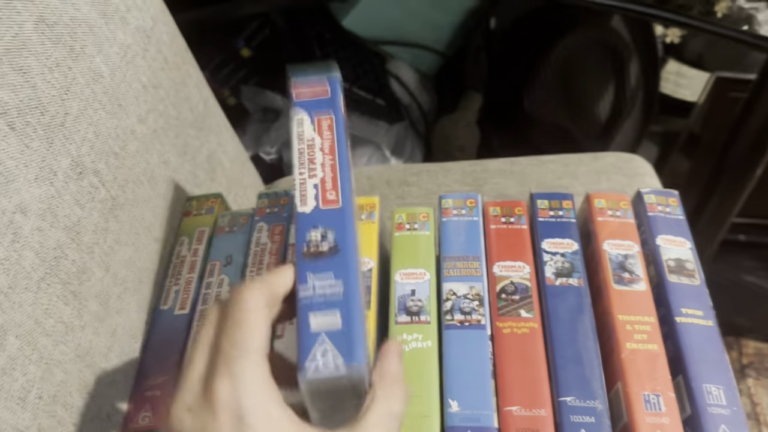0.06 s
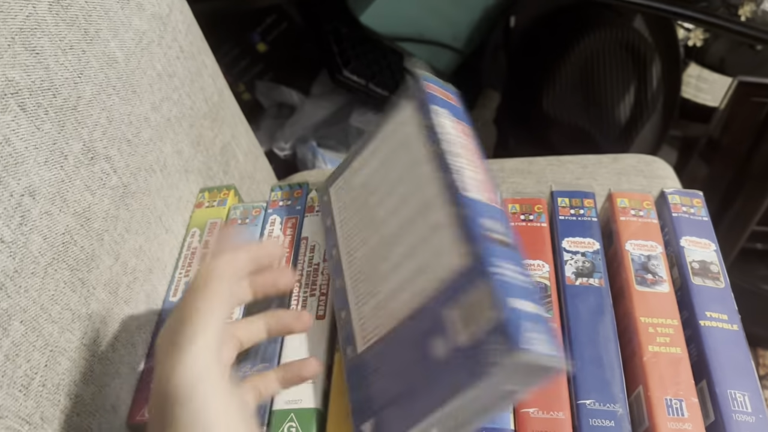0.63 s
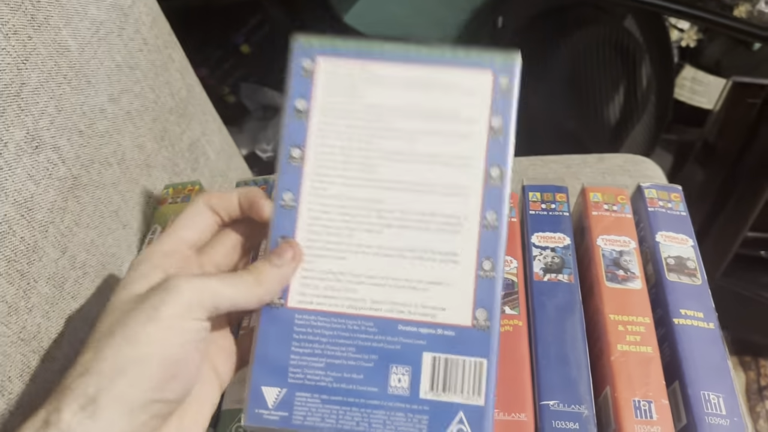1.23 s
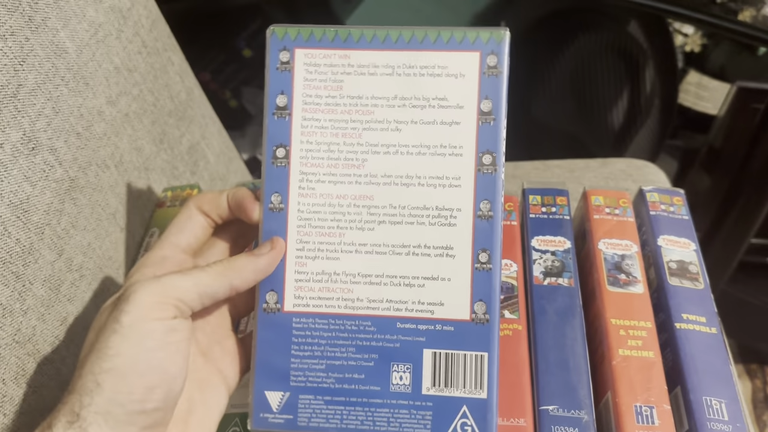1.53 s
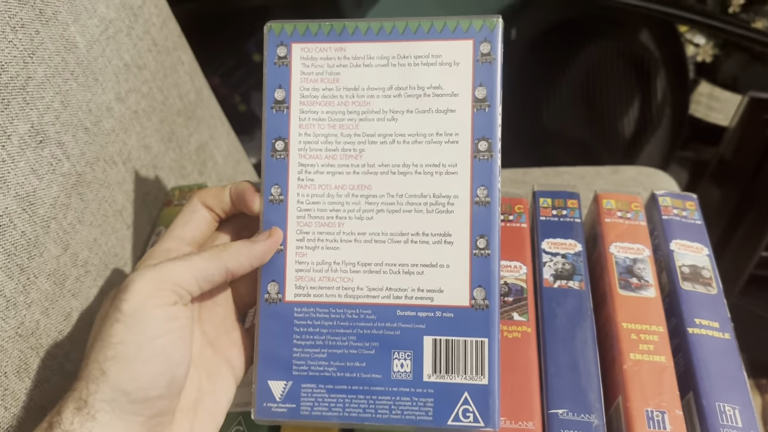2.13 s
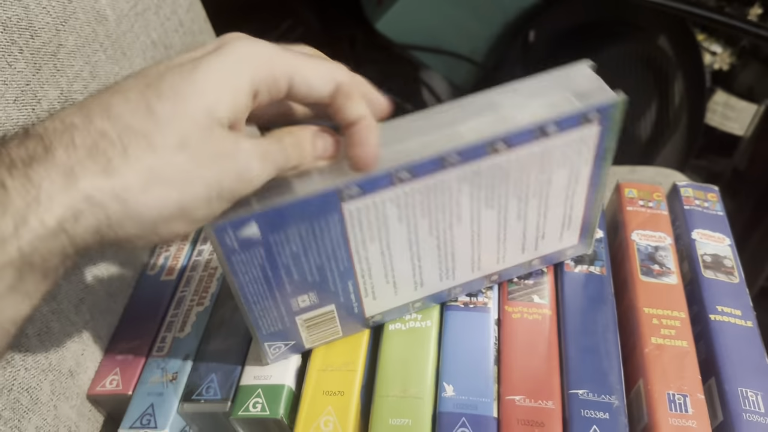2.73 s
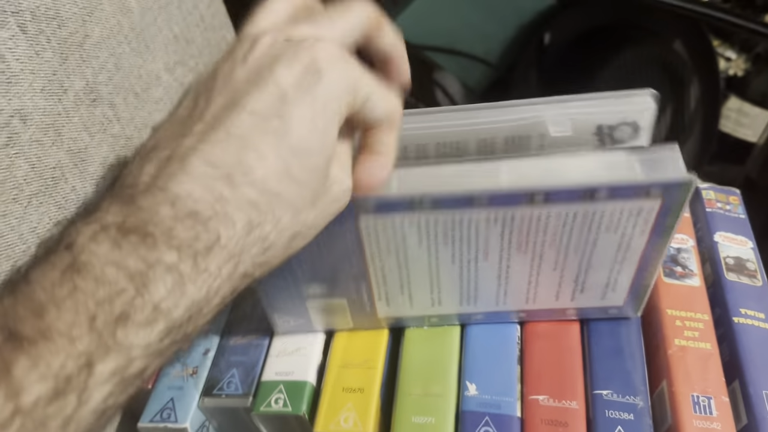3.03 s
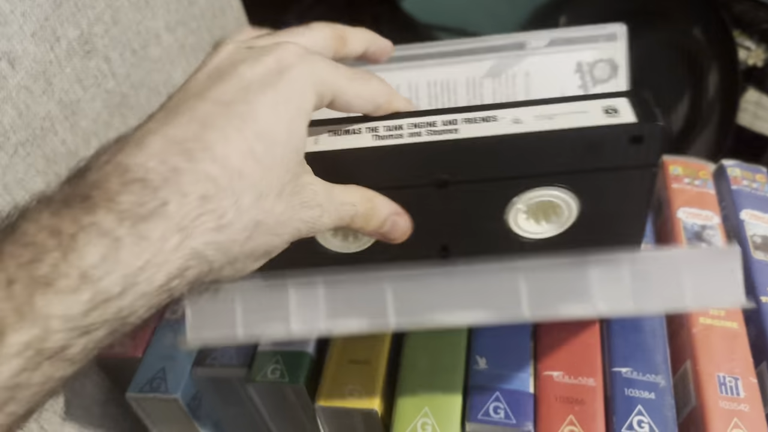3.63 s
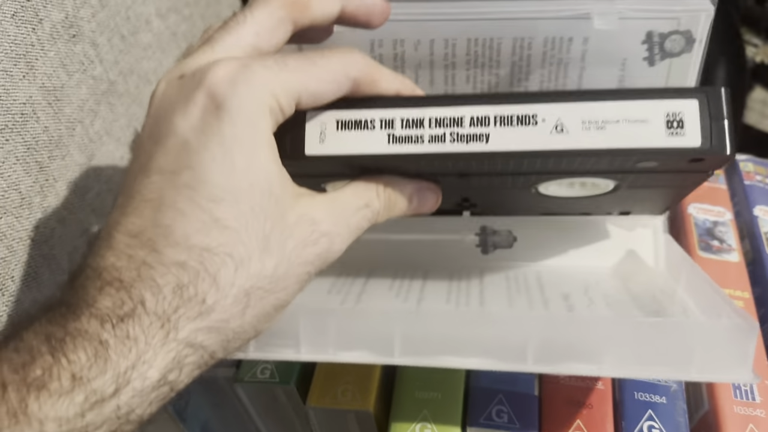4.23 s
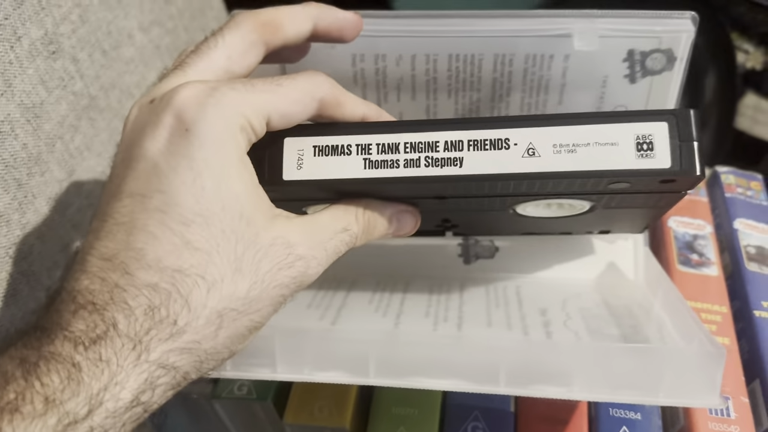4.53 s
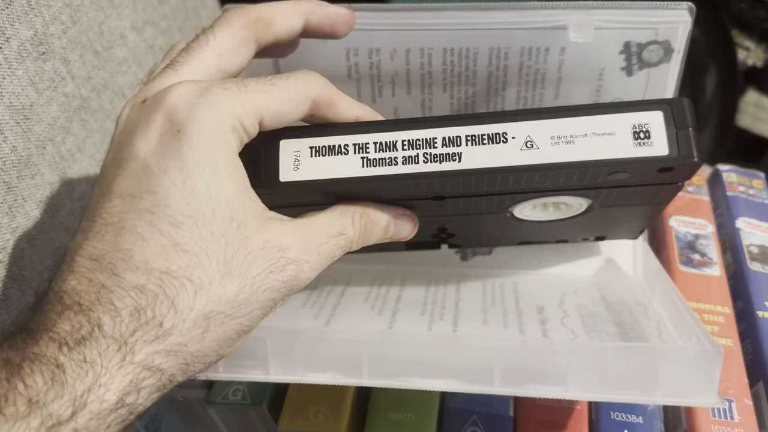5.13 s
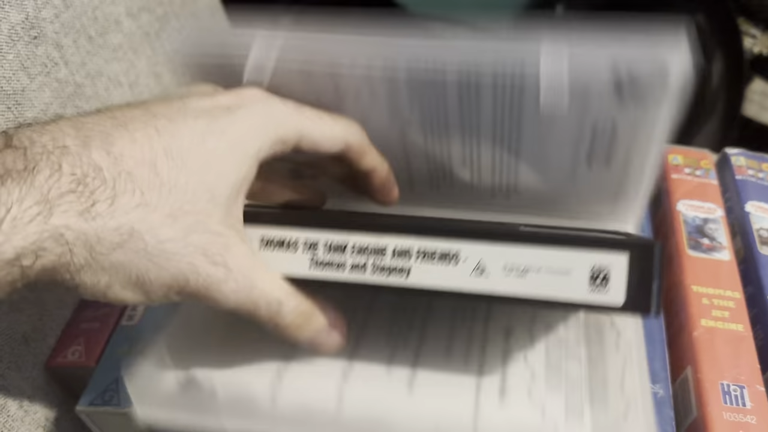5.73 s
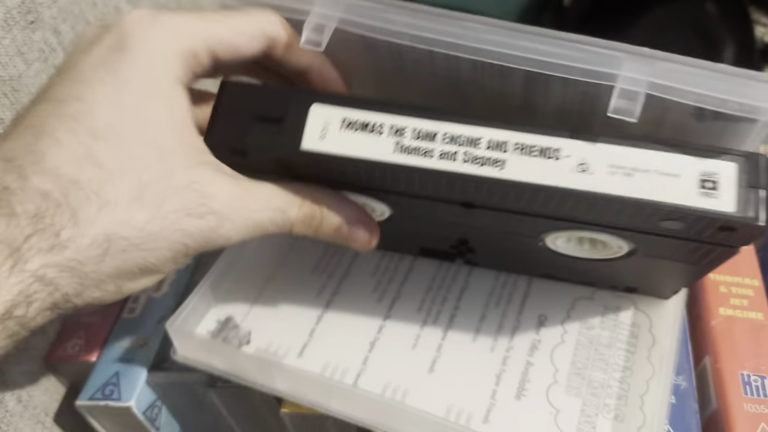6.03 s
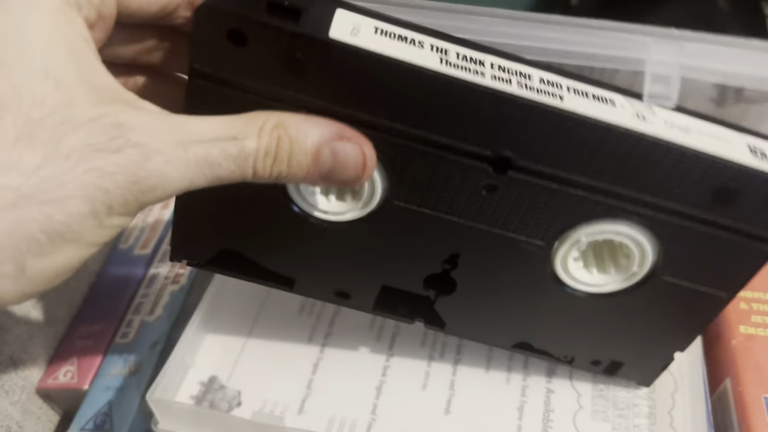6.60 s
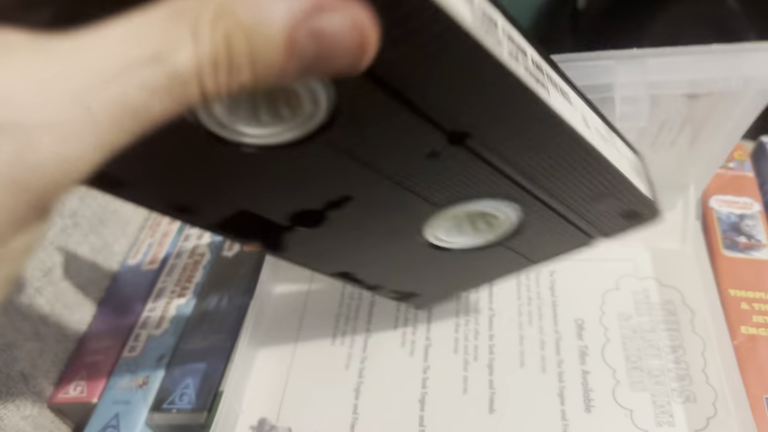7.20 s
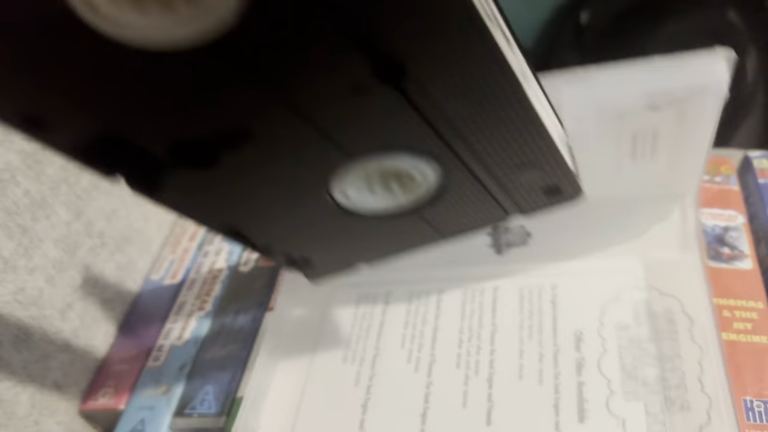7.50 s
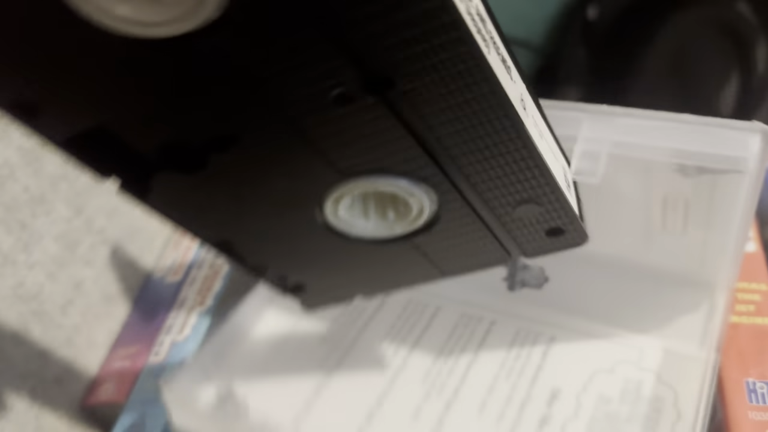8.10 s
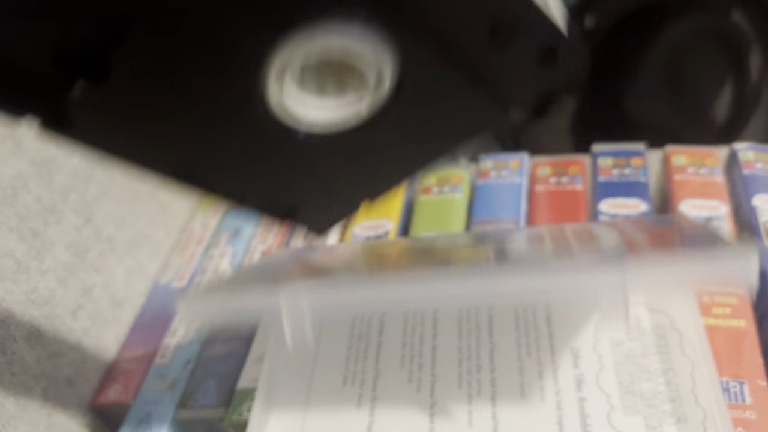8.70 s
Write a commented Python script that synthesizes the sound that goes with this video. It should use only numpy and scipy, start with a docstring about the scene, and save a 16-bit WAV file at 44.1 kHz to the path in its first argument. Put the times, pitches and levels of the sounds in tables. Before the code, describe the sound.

A plastic video tape case bumps out of a row, clicks open, and the cassette is scraped out and turned over, its reels rattling.

```python
"""A plastic case bumps on its neighbours as it is pulled from a row, close to the microphone in a small room.
Its catch is prised open in a few jerks; a videocassette clicks against lid and tray, rasps out and is
turned over, its loose reels knocking. Each contact shakes the plastic panels, fingers rub over them and
edges stick and slip. Under it lie a faint low hum and still room air."""
import sys
import numpy as np
from scipy import signal
from scipy.fft import rfft, irfft, next_fast_len
from scipy.io import wavfile
from scipy.ndimage import map_coordinates

SR = 44100
rng = np.random.default_rng(int(sys.argv[2]) if len(sys.argv) > 2 else 0)


def transcribe(u):
    """Save the signal u as a 16-bit wav file named by the first command-line argument.

    u: samples, shape (n,) or (channels, n), limited to [-1, 1]; the rate is SR.
    q: integer samples, one column per channel.
    """
    v = np.clip(np.atleast_2d(u).T, -1, 1)
    q = np.round(v * 32767).astype(np.int16)
    wavfile.write(sys.argv[1], SR, q)


N = 385875
HIT_SIZE, LEAD = 8192, 256  # samples in one contact, and before its onset

# single resonances of the open case and of the cassette: pitch_hz, width_hz, level_db
CASE_RESONANCES = [(659.5, 50, 3), (956, 62, -8), (1420, 26, -10.5), (1860, 170, -8.5), (2220, 59, -9.5),
                   (2580, 19, -11.5), (4400, 850, -11), (6730, 70, -15)]
CASSETTE_RESONANCES = [(128, 24, 4.5), (291, 58, -4.5), (722, 94, 3.5), (1210, 24, -11), (1454, 90, -23.5),
                       (1966, 220, -19.5), (2600, 37, -6.5), (4140, 140, -12.5)]
# the bed of overlapping modes between them: frequency_hz, level_db
CASE_BED = [(30, 2.5), (120, -2), (350, 3.5), (650, 3), (1300, 1), (2600, 2), (5000, -13.5), (8000, -5),
            (10000, -22), (15000, -28.5)]
CASSETTE_BED = [(40, 7.5), (130, -9.5), (450, -3), (800, 16), (1400, 8.5), (2600, 8), (5500, 3), (8000, 2),
                (10000, -5.5), (15000, -32)]
# edges scraping on the open case: start_s, length_s, level_db
CASE_STROKES = [(3.213, .015, -47), (3.388, 0.18, -44.5), (3.6, 0.23, -39), (3.851, 0.089, -43.5),
                (4.084, 0.047, -35), (4.139, 0.08, -44), (4.247, .13, -62), (4.579, .2, -66.5),
                (5.04, .08, -68), (5.45, 0.2, -44), (5.82, 0.28, -45), (6.129, 0.21, -50)]


def amp(db):
    return 10 ** (np.asarray(db) / 20)


def unit(x):
    return x / np.sqrt(np.mean(x ** 2) + 1e-30)


def along(points, hz):
    """Read (frequency_hz, value) points on a log frequency axis."""
    knots_hz, values = np.transpose(points)
    return np.interp(np.log(hz + 1), np.log(knots_hz + 1), values)


def wobble(rate):
    """A smooth random curve, rate knots a second."""
    knots = rng.standard_normal(int(N * rate / SR) + 4)
    return map_coordinates(knots, [np.arange(N) * rate / SR], order=2)


def filtered(x, response):
    """Pass x through a complex response of frequency."""
    size = next_fast_len(N + SR // 2)
    return irfft(rfft(x, size) * response(np.fft.rfftfreq(size, 1 / SR)), size)[..., :N]


def add(track, start_s, sound):
    """Mix in a sound that begins LEAD samples early."""
    start = max(round(start_s * SR) - LEAD, 0)
    part = track[:, start:start + sound.shape[1]]
    part += sound[:, :part.shape[1]]


def spread(pair, hz, direct=0):
    """Two unrelated spectra become left and right; direct treble reaches the two sides out of phase."""
    # stereo width at the microphone: frequency_hz, side_over_mid_db
    widths = [(100, -23), (500, -14.5), (1000, -12.5), (2500, 0), (5000, -1), (9000, -2)]
    share, width = np.clip(direct, -1, 1), amp(along(widths, hz))
    mid, side = pair[0], width * (1j * share * pair[0] + np.sqrt(1 - share ** 2) * pair[1])
    return np.array([mid + side, mid - side]) / np.sqrt(1 + width ** 2)


def stereo(pair, response):
    """Two unrelated signals through one body, at rms 1."""
    size = next_fast_len(N + SR // 2)
    hz = np.fft.rfftfreq(size, 1 / SR)
    return unit(irfft(spread(rfft(pair, size), hz) * response(hz), size)[:, :N])


def resonance(hz, pitch_hz, width_hz):
    """Response of one damped mode."""
    return 1j * hz * width_hz / (pitch_hz ** 2 - hz ** 2 + 1j * hz * width_hz)


def shell(hz, body, modes, ring_db):
    """Response of a plastic shell: single resonances standing on a dense bed of modes."""
    rings = sum(amp(db) * resonance(hz, pitch, width) for pitch, width, db in modes)
    return amp(along(body, hz)) + amp(ring_db) * rings


def room_tone(air_db=-58):
    """Still room air and a slightly unsteady hum."""
    # the hum: pitch_hz, level_db
    tones = [(102.3, -62.5)]
    # colour of the air: frequency_hz, level_db
    air = [(22, -22.5), (55, 0.5), (105, 2), (190, -15.5), (900, -23), (1300, -22), (2200, -30.5),
           (2700, -24), (3300, -32.5), (7000, -43.5), (10500, -60.5), (15000, -57)]
    # its stereo width: frequency_hz, side_over_mid_db
    air_width = [(60, -7.5), (900, -1)]
    t = np.arange(N) / SR
    hum = sum(amp(db + 1.4 * wobble(5.1)) * np.sqrt(2) * np.sin(2 * np.pi * hz * t + .6 * wobble(8.9))
              for hz, db in tones)
    colour = lambda hz: amp(along(air, hz) + np.outer([0, 1], along(air_width, hz)))
    mid, side = filtered(rng.standard_normal((2, N)), colour)
    return hum + amp(air_db) * unit(np.array([mid + side, mid - side]))


def walls(x, build_s=0.0027):
    """The near walls answer with a short diffuse tail."""
    # reverberation of the room: frequency_hz, t60_s
    decay = [(100, 0.36), (3000, 0.25), (8000, .3), (15000, 0.067)]
    hz, t, noise = signal.stft(rng.standard_normal((2, SR // 2)), SR, nperseg=256)
    fade = amp(-60 * t / along(decay, hz)[:, None]) * (1 - np.exp(-t / build_s))
    tail = signal.istft(spread(noise, hz[:, None]) * fade, SR, nperseg=256)[1]
    return signal.fftconvolve(x, tail / np.linalg.norm(tail[0]), axes=1)[:, :N]


def strokes(rows, attack_s=0.0074, release_s=.02):
    """Gain over time of sliding strokes: each takes hold, keeps its level and lets go."""
    t = np.arange(N) / SR
    power = np.zeros(N)
    for start, length, db in rows:
        attack = np.clip((t - start) / attack_s, 0, 1)
        release = np.exp(-np.clip((t - start - length) / release_s, 0, 20))
        power += (amp(db) * attack * release) ** 2
    return np.sqrt(power)


def fingers(drag_db=-0.5, swish_db=3.5):
    """Skin drags on the panels and swishes over the smooth sleeve."""
    # strokes on the panels and on the sleeve: start_s, length_s, level_db
    drags = [(0.98, .31, -52), (1.3, 0.37, -66.5), (2.35, 0.1, -58), (2.62, 0.24, -53), (3.19, 0.52, -52),
             (3.88, 0.058, -43), (4.08, 0.13, -49.5), (5.56, 0.57, -55.5), (7.2, 0.13, -47.5),
             (7.87, 0.13, -47), (8.12, 0.38, -51.5), (8.35, 0.25, -43.5)]
    swishes = [(0.51, 0.37, -64), (0.98, 0.22, -62.5), (2.34, 0.047, -62.5), (2.7, 0.05, -55),
               (6.28, 0.099, -60.5)]
    # their spectra: frequency_hz, density_db
    drag_colour = [(70, -17), (200, 0.5), (450, 2), (750, -17.5), (2000, -43)]
    swish_colour = [(500, -13.5), (1200, 6), (4000, 1.5), (6000, -2.5), (8200, 0), (10000, -24.5),
                    (15000, -19.5)]
    drag_grain = rng.standard_normal((2, N)) * amp(4.4 * wobble(60))
    swish_grain = rng.standard_normal((2, N)) * amp(2.0 * wobble(90))
    drag = stereo(drag_grain, lambda hz: amp(along(drag_colour, hz)))
    swish = stereo(swish_grain, lambda hz: amp(along(swish_colour, hz)))
    return amp(drag_db) * strokes(drags) * drag + amp(swish_db) * strokes(swishes) * swish


def friction(body, modes, slips_per_s, scatter, ring_s, bed_db, dull_hz):
    """Stick and slip: each slip briefly rings one panel resonance, over a patchy bed of finer slips."""
    count = int(slips_per_s * N / SR)
    when, pick, tune, size = rng.random((count, 4)).T
    panel_hz, _, panel_db = np.transpose([mode for mode in modes if mode[0] > 500])
    which = (pick * len(panel_hz)).astype(int)
    pitch = panel_hz[which] * (.92 + .16 * tune)
    strength = amp(panel_db[which] / 2 - scatter * np.log(.04 + size))
    step = np.arange(LEAD * 2)
    fade = np.exp(-step / SR / ring_s) * np.hanning(4 * LEAD)[2 * LEAD:]
    rings = strength[:, None] * np.sin(2 * np.pi * pitch[:, None] * step / SR) * fade
    at = (when * N).astype(int)[:, None] + step
    slips = [np.bincount(at.ravel(), (rings * rng.choice([-1, 1], (count, 1))).ravel(), N)[:N]
             for _ in range(2)]
    # a sliding edge excites neither the bass nor the top treble
    edge = lambda hz: hz ** 3 / (hz ** 3 + 450 ** 3) / (1 + (hz / dull_hz) ** 2)
    grit = rng.standard_normal((2, N)) * amp(4 * wobble(350))
    bed = stereo(grit, lambda hz: shell(hz, body, modes, ring_db=3) * edge(hz))
    pressure = amp(3 * wobble(55))
    return unit(pressure * (stereo(np.array(slips), edge) + amp(bed_db) * bed))


def scraping(gain_db=-1):
    """Sliding edges creak on the open case, and later on the hollow cassette."""
    # the cassette rubbing in the hand and on the tray: start_s, length_s, level_db
    rubs = [(6.68, 0.31, -57.5), (7.04, 0.31, -52.5), (7.33, 0.029, -44), (7.85, .11, -44),
            (8.1, 0.2, -47.5), (8.3, 0.26, -47.5), (8.49, 0.087, -38)]
    case = friction(CASE_BED, CASE_RESONANCES, slips_per_s=680, scatter=8,
                    ring_s=.004, bed_db=0.5, dull_hz=7730)
    cassette = friction(CASSETTE_BED, CASSETTE_RESONANCES, slips_per_s=570, scatter=-1.5,
                        ring_s=0.0025, bed_db=-0.5, dull_hz=7940)
    return amp(gain_db) * (strokes(CASE_STROKES) * case + strokes(rubs) * cassette)


def ribbed_side(grain_db=4.0, pressure_db=2):
    """The ribbed side of the cassette rasps over the edge of the tray."""
    # the cassette sliding out: start_s, length_s, level_db
    slides = [(5.96, 0.159, -47.5), (6.15, 0.12, -60)]
    # two broad treble bands of the ribs: pitch_hz, width_hz, level_db
    rib_bands = [(3970, 910, 0.5), (7200, 1600, -7)]
    rasp = rng.standard_normal((2, N)) * amp(grain_db * wobble(420) + pressure_db * wobble(40))
    ribs = lambda hz: sum(amp(db) * resonance(hz, pitch, width) ** 2 for pitch, width, db in rib_bands)
    return strokes(slides) * stereo(rasp, ribs)


def contacts(rows, body, modes, *, ring_db, ripple_db, lowest_hz, rise_s, squareness, chatter, bending,
             direct, gain_db, thump_db, thump_slope, thump_life, snap_db, snap_slope, snap_life):
    """Each contact is a short chatter of edges that shakes the panels; squareness ends it more abruptly.
    The bass thump and treble snap last their life times the contact's length."""
    track = np.zeros((2, N))
    step = np.arange(HIT_SIZE)
    t = np.maximum(step - LEAD, 0) / SR
    hz = np.fft.rfftfreq(HIT_SIZE, 1 / SR)
    below = lambda edge_hz: 1 / np.sqrt(1 + (hz / edge_hz) ** 8)
    above = lambda edge_hz: np.sqrt(1 - below(edge_hz) ** 2)
    bands = above(lowest_hz) * below(450), above(450) * below(4000), above(4000)
    # bending waves: the delay falls as one over the root of frequency
    delay = bending * np.maximum(1 / np.sqrt(hz + 30) - 1 / np.sqrt(1800), 0)
    travel = np.exp(-2j * np.pi * np.cumsum(delay) * hz[1])
    end_fade = np.clip(2 - 2.2 * step / HIT_SIZE, 0, 1)  # each tail fades smoothly to silence
    energy_scale = np.sqrt(.01 * SR / HIT_SIZE)  # a band's level is its energy as an rms over 10 ms
    for start_s, db, hardness_db, length_s in rows:
        # grip and point of contact retune the resonances and change their strengths
        chance = rng.standard_normal((len(modes), 2))
        gripped = [(pitch * np.exp(.035 * detune), width, level + 5 * boost)
                   for (pitch, width, level), (detune, boost) in zip(modes, chance)]
        # the dense modes answer unevenly, with a random level every 191 Hz
        humps = map_coordinates(rng.standard_normal(HIT_SIZE // 32), [hz / 191], order=2)
        tilt = (hz + 170) ** (.025 * (db + 30))  # a stronger blow favours the higher resonances
        panel = shell(hz, body, gripped, ring_db) * amp(ripple_db * humps) * travel * tilt
        grit = np.exp(chatter * np.interp(step, step[::32], rng.standard_normal(HIT_SIZE // 32)))
        facing = direct * rng.choice([-1, 1])
        # a hard edge trades thump for snap
        levels_db = thump_db - thump_slope * hardness_db, 0, snap_db + snap_slope * hardness_db
        for band, band_db, life in zip(bands, levels_db, (thump_life, 1, snap_life)):
            fade = np.exp(-(t / max(length_s * life, 1e-3)) ** squareness)
            force = grit * (1 - np.exp(-t / rise_s)) * fade * rng.standard_normal((2, HIT_SIZE))
            sound = irfft(spread(rfft(force), hz, facing) * panel * band) * end_fade
            add(track, start_s, unit(sound) * energy_scale * amp(db + band_db + gain_db))
    return track


def edge_ticks(count=44, offset_db=-3, scatter_db=3.5, length_s=.003):
    """Now and then a scraping edge catches and ticks, ringing the case briefly."""
    start, length, db = np.transpose(CASE_STROKES)
    where, size = rng.random((count, 2)).T
    # the ticks are shared out over the total time spent scraping
    ends = np.cumsum(length)
    slid = (np.arange(count) + where) / count * ends[-1]
    stroke = np.searchsorted(ends, slid)
    times = start[stroke] + ends[stroke] - slid
    levels = db[stroke] + offset_db + scatter_db * (2 * size - 1)
    ticks = [(start_s, level, 0, length_s) for start_s, level in zip(times, levels)]
    return contacts(ticks, CASE_BED, CASE_RESONANCES, ring_db=4, ripple_db=8.5, lowest_hz=150,
                    rise_s=0.00056, squareness=0.76, chatter=.2, bending=.079, direct=0.545, gain_db=0.5,
                    thump_db=-10, thump_slope=0, thump_life=1,
                    snap_db=-11.5, snap_slope=0, snap_life=0.84)


def low_thuds(pitch_hz=(62, 84), rise_s=0.008, decay_s=0.022):
    """Three deep, low thuds sound under the handling."""
    # the thuds: start_s, level_db
    thuds = [(0.739, -19), (2.927, -34), (5.758, -21.5)]
    track = np.zeros((2, N))
    t = np.maximum(np.arange(HIT_SIZE) - LEAD, 0) / SR
    envelope = (1 - np.exp(-t / rise_s)) * np.exp(-t / decay_s)
    for start_s, db in thuds:
        tones = sum(np.sin(2 * np.pi * (hz * t + rng.random() / 2)) for hz in pitch_hz)
        add(track, start_s, np.tile(amp(db) * tones * envelope, (2, 1)))
    return track


def catch():
    """The catch lets go in a few jerks, with the box still hollow behind it."""
    # jerks of the catch: start_s, level_db, hardness_db, length_s
    jerks = [(2.842, -39.5, -1.5, 0.0045), (2.857, -38, -6, 0.013), (2.91, -27, -7, 0.017),
             (2.94, -24.5, 0, 0.026), (2.984, -32, 3, 0.0035), (3.053, -33, 3, 0.0051)]
    return contacts(jerks, CASE_BED, CASE_RESONANCES, ring_db=3, ripple_db=3, lowest_hz=55,
                    rise_s=0.00069, squareness=0.86, chatter=0.32, bending=0.0735, direct=0.48,
                    gain_db=1.74, thump_db=-4, thump_slope=0.87, thump_life=1.0,
                    snap_db=-7, snap_slope=1.0, snap_life=0.93)


def loose_reels():
    """Loose reels drop against the hollow cassette as it tilts."""
    # knocks of the reels: start_s, level_db, hardness_db, length_s
    knocks = [(5.632, -40, -11.5, 0.013), (5.752, -24, -3, 0.0074), (6.576, -37, -3, 0.0092),
              (6.698, -41, 2.5, 0.011), (6.735, -43.5, 5, 0.012), (6.775, -41, 5, 0.003),
              (6.837, -41.5, -2, 0.027), (6.888, -30, 10, 0.0072), (7.002, -25.5, 3, 0.0086),
              (7.034, -30, 28, 0.0033), (7.144, -20, 3, 0.0047), (7.158, -19, 4, 0.006),
              (7.319, -35, -6, 0.015), (7.36, -33, -1, 0.013), (7.559, -49.5, -10, 0.0048),
              (7.717, -44.5, -7, 0.009), (7.822, -36, -5.5, 0.013), (7.847, -28.5, -3.5, 0.01),
              (7.922, -26.5, 7, 0.0027), (8.077, -33, -7, 0.0097), (8.108, -36.5, 3, 0.012),
              (8.301, -22.5, 6.5, 0.0053), (8.416, -22, 4, 0.014), (8.502, -33, -0.5, .012),
              (8.604, -20, 3, 0.0081), (8.631, -21, 2.5, 0.0054)]
    return contacts(knocks, CASSETTE_BED, CASSETTE_RESONANCES, ring_db=6, ripple_db=4, lowest_hz=99,
                    rise_s=0.00093, squareness=0.94, chatter=.45, bending=0.1688, direct=0.51,
                    gain_db=-1.17, thump_db=2, thump_slope=1.0, thump_life=1.07,
                    snap_db=-13, snap_slope=0.27, snap_life=0.86)


def open_case():
    """The thin lid flexes and the cassette clicks against its tray."""
    # clicks on lid and tray: start_s, level_db, hardness_db, length_s
    clicks = [(3.288, -45, -4, 0.018), (3.34, -42, -2, 0.0083), (3.363, -35, -9.5, 0.0064),
              (3.463, -34.5, -14, 0.0071), (3.589, -33.5, -5, 0.0081), (3.599, -26, 1.5, 0.019),
              (3.672, -33, -1, 0.0017), (3.687, -31, -2, 0.0033), (3.746, -25.5, -2, 0.017),
              (3.772, -31, -2.5, .004), (3.863, -34, -2, .009), (3.873, -24, 0.5, 0.0064),
              (3.977, -31, -0.5, 0.015), (4.051, -32.5, -5.5, 0.028), (5.438, -28.5, 1.5, 0.0073),
              (5.4595, -18, 1, .014), (5.502, -22, -3.5, 0.011), (5.6, -31, -5.5, 0.01),
              (5.684, -36, -3.5, 0.014), (5.735, -35, -11, 0.0068), (5.774, -18, 3.5, .009),
              (5.796, -18, -1, .012), (5.824, -23, 3.5, 0.0088), (5.923, -24, 4.5, 0.0049),
              (5.987, -37.5, -1, 0.0068), (6.076, -37.5, -13, 0.0098), (6.278, -22, 2, 0.0098),
              (6.293, -16, 7, 0.007), (6.365, -34, 3, .006)]
    return contacts(clicks, CASE_BED, CASE_RESONANCES, ring_db=7, ripple_db=3.5, lowest_hz=69,
                    rise_s=0.00086, squareness=0.96, chatter=0.21, bending=0.0752, direct=.6,
                    gain_db=0.04, thump_db=-12.5, thump_slope=.6, thump_life=.8,
                    snap_db=-7.5, snap_slope=1.0, snap_life=0.56)


def closed_case():
    """The full case scuffs and bumps on its neighbours and against the hand."""
    # bumps of the case: start_s, level_db, hardness_db, length_s
    bumps = [(0.066, -13.5, 1, 0.032), (0.184, -46.5, 1, 0.0072), (0.563, -37, 1, 0.0097),
             (0.722, -15, 2.5, .034), (0.993, -51.5, 10, 0.013), (1.118, -49, -8, 0.015),
             (1.152, -50.5, -10.5, 0.0092), (1.18, -43.5, -6, 0.0093), (2.343, -52.5, -6.5, 0.016),
             (2.519, -31.5, -1.5, 0.029), (2.547, -28, -1, 0.028)]
    # resonances of the shut box: pitch_hz, width_hz, level_db
    resonances = [(283, 33, -3), (1090, 16, -9), (1550, 140, -24.5), (2016, 98, -5)]
    # the bed of modes between them: frequency_hz, level_db
    bed = [(25, -6), (70, -2.5), (300, 7), (550, 1.5), (1000, 5), (2600, -4.5), (5000, -8), (8000, -11),
           (10000, -28.5), (15000, -32)]
    return contacts(bumps, bed, resonances, ring_db=0.5, ripple_db=2.5, lowest_hz=45,
                    rise_s=0.011, squareness=2.1, chatter=.45, bending=.093, direct=1.0,
                    gain_db=0.22, thump_db=0.5, thump_slope=1.0, thump_life=.9,
                    snap_db=-6.5, snap_slope=.5, snap_life=0.84)


def scene():
    """Close contacts and their echo in the room, with rubbing and still air beneath."""
    bumps = closed_case()
    handling = catch() + open_case() + loose_reels()
    echo = walls(amp(-14.5) * bumps + amp(-17.5) * handling)
    beneath = low_thuds() + fingers() + scraping() + room_tone() + edge_ticks() + ribbed_side()
    return bumps + handling + echo + beneath


def record(dry, notch_hz=11300, notch_width_hz=1100, notch_db=-14, low_cut_hz=42, top_hz=16000):
    """Overall tone: the sides differ in colour, dip near 11 kHz and lose deep bass and top treble."""
    # balance of the two sides: frequency_hz, left_over_right_db
    balance = [(900, .5), (1700, -4), (3300, -4), (6800, 2.5), (10000, 1)]
    notch = lambda hz: notch_db * np.exp(-((hz - notch_hz) / notch_width_hz) ** 2)
    sides = lambda hz: amp(np.outer([.5, -.5], along(balance, hz)) + notch(hz))
    low_cut = lambda hz: hz ** 2 / (hz ** 2 - low_cut_hz ** 2 - 1j * hz * low_cut_hz)
    high_cut = lambda hz: 1 / (1 + (hz / top_hz) ** 120)
    return filtered(dry, lambda hz: sides(hz) * low_cut(hz) * high_cut(hz))


dry = scene()
out = record(dry)
transcribe(out)
```